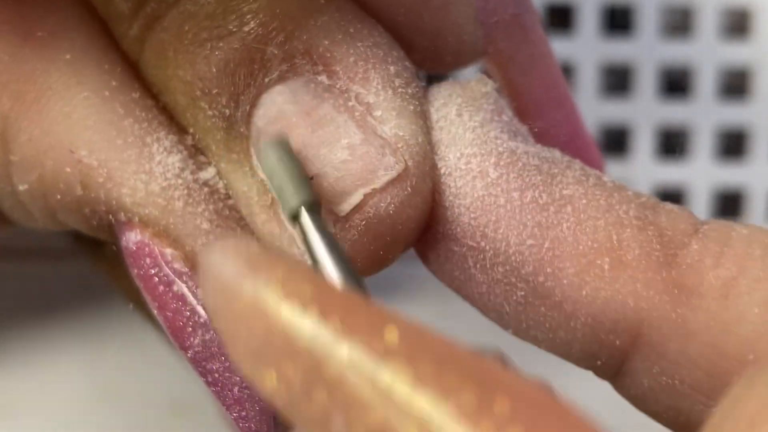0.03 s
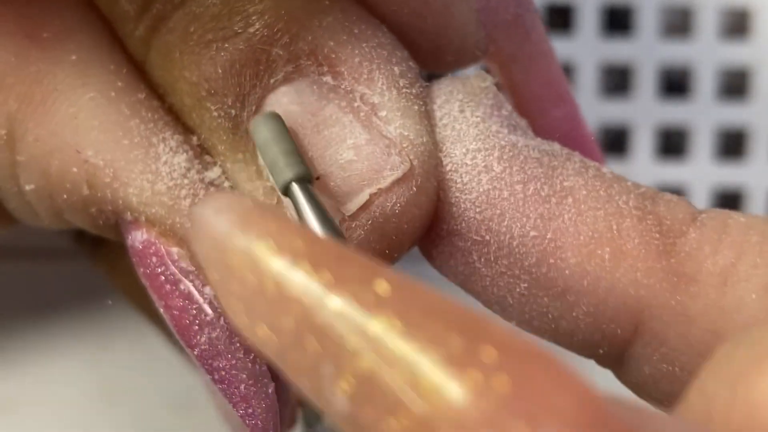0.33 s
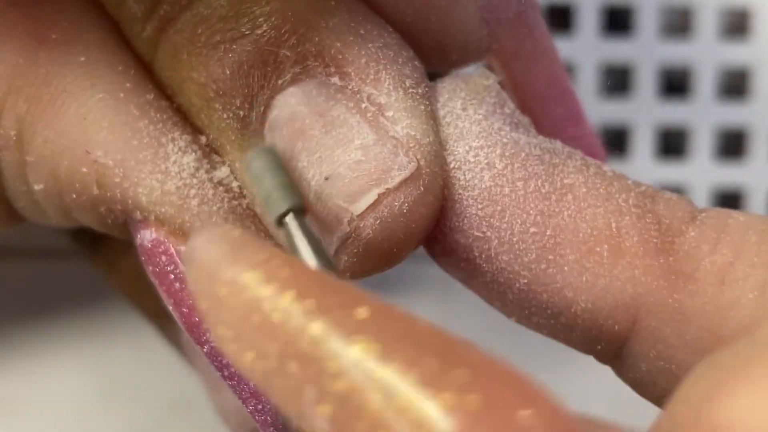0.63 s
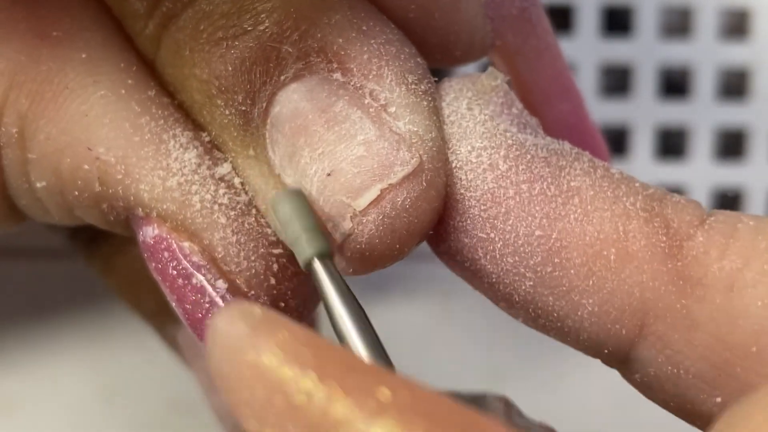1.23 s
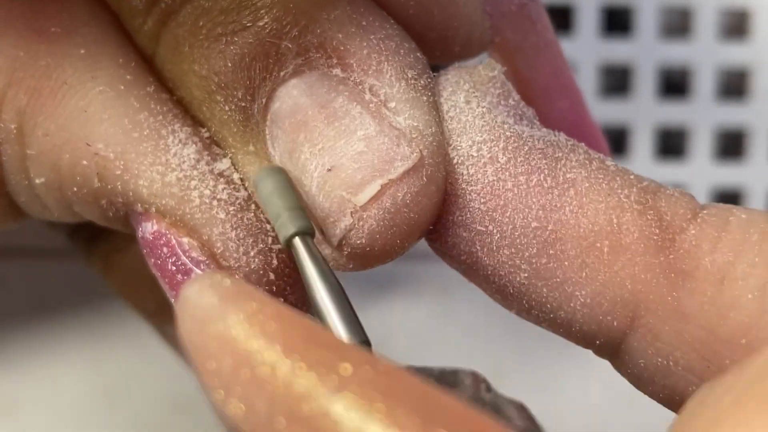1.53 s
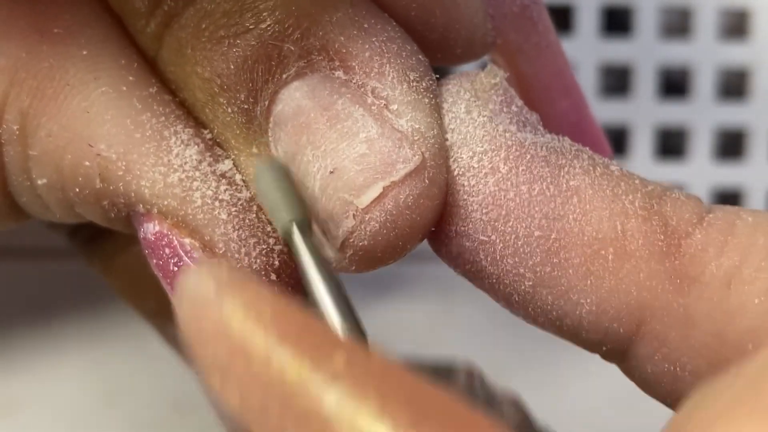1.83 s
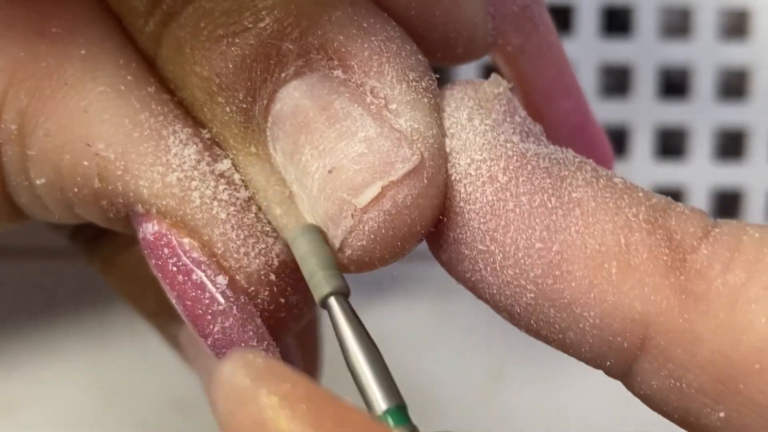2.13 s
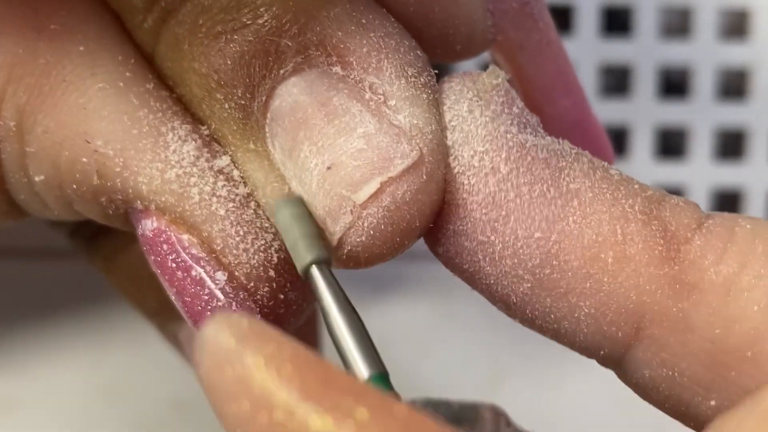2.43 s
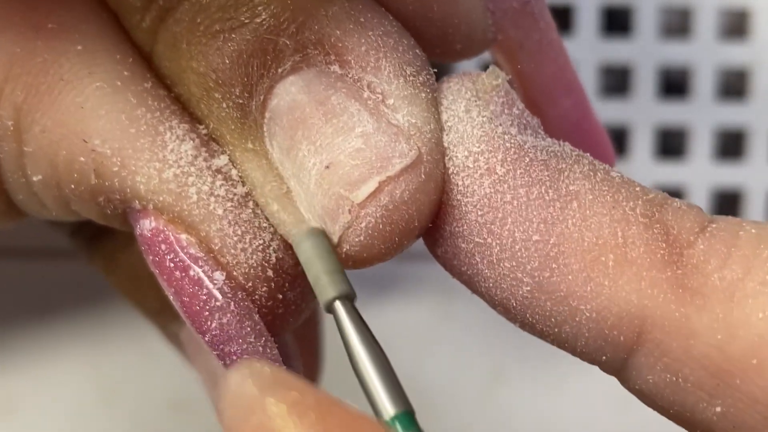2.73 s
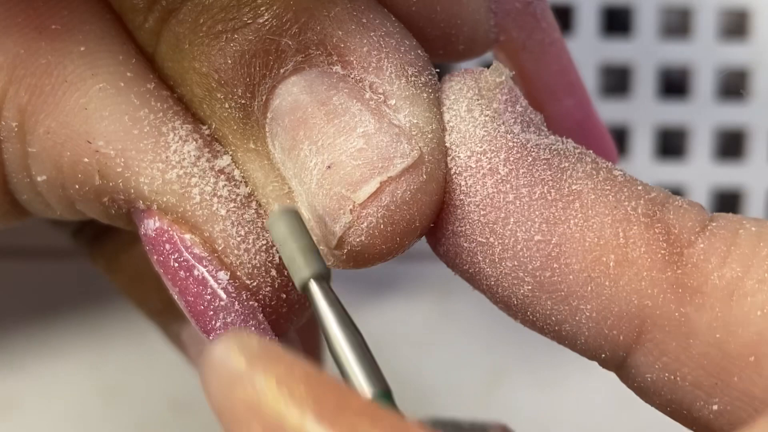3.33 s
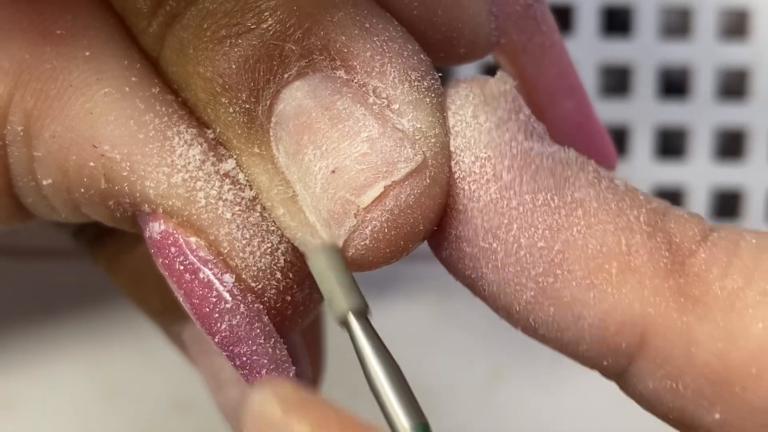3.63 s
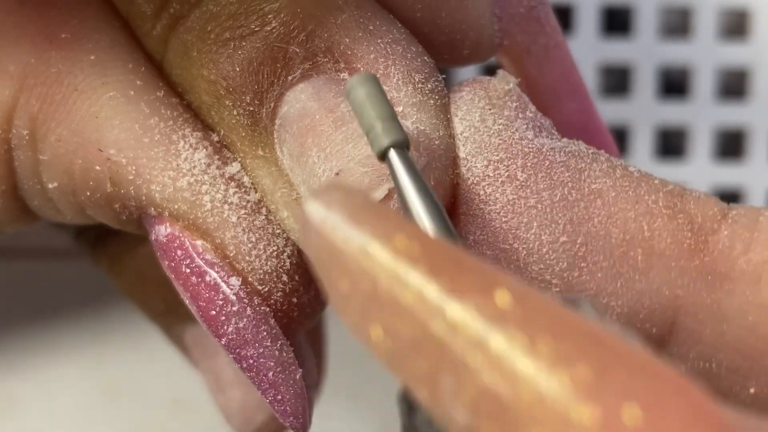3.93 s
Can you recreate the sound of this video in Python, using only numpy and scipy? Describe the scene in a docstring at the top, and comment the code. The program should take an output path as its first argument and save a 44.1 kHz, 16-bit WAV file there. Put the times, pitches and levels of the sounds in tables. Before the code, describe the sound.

An electric nail drill whines and grinds against a fingernail over a faint fan hum.

```python
"""Electric nail drill on a fingernail

A nail drill spins close by, its bearings whining, while its rough bit is stroked along a nail.
The same grit passes the nail on every turn, so the grinding buzzes at the speed of the shaft,
which sags under load. A dust-collector fan hums underneath. There is no room echo."""
import sys
import numpy as np
from scipy import signal
from scipy.fft import rfft, irfft, next_fast_len
from scipy.io import wavfile
from scipy.ndimage import uniform_filter1d, map_coordinates

SR = 44100
rng = np.random.default_rng(int(sys.argv[2]) if len(sys.argv) > 2 else 0)


def generate_wav(signal):
    """Clip the signal to [-1, 1] and save it as 16-bit WAV at the path in sys.argv[1]."""
    frames = np.transpose(np.atleast_2d(signal))
    scaled = np.clip(frames, -1, 1) * 32767
    pcm = np.round(scaled).astype(np.int16)
    wavfile.write(sys.argv[1], SR, pcm)


N = 176400  # 4 seconds

# How fast the shaft spins: time_s, turns_per_s
SHAFT_SPEED = [(0.0, 185.4), (0.21, 190.0), (0.27, 187.1), (0.39, 191.9), (0.54, 189.3), (0.6, 193.7),
               (0.65, 191.0), (0.78, 192.8), (0.8, 189.4), (0.91, 191.5), (1.06, 190.1), (1.13, 191.1),
               (1.27, 193.0), (1.4, 190.9), (1.51, 194.8), (1.59, 193.4), (1.61, 190.1), (1.82, 194.9),
               (1.91, 188.7), (2.05, 192.9), (2.17, 188.7), (2.23, 188.7), (2.4, 193.1), (2.51, 191.0),
               (2.64, 193.3), (2.73, 189.8), (2.98, 191.9), (3.05, 190.9), (3.11, 194.3), (3.21, 196.3),
               (3.34, 196.7), (3.39, 199.5), (3.56, 196.6), (3.77, 200.6), (3.86, 199.8), (3.99, 203.3)]


def grinding(turns):
    """The bit buzzes, rasps and hisses while it touches the nail; turns counts the shaft's turns."""
    # One list per stroke, from touch to lift: time_s, buzz_gain_db, rasp_gain_db, hiss_gain_db
    strokes = [
        [(0.0, -38.5, -48.5, -47), (0.03, -59, -60, -50)],
        [(0.135, -47, -54.5, -48.5), (0.217, -40.5, -56, -40), (0.25, -46, -55.5, -41.5),
         (0.295, -42.5, -51.5, -40.5)],
        [(0.36, -43, -51.5, -49), (0.47, -39.5, -53, -41), (0.52, -43, -50.5, -46), (0.65, -41, -50, -39.5),
         (0.682, -46, -54, -42), (0.844, -42, -50, -39.5), (0.87, -43.5, -53, -44), (0.95, -41.5, -46.5, -41),
         (0.99, -37, -53.5, -39), (1.086, -47, -53.5, -44), (1.148, -38.5, -46, -42.5), (1.166, -37, -59, -40),
         (1.23, -43.5, -56.5, -45.5), (1.32, -41.5, -54.5, -42.5), (1.406, -46.5, -55, -41),
         (1.435, -39.5, -58, -46)],
        [(1.525, -53, -49, -36.5), (1.55, -45.5, -47, -39), (1.62, -43, -57.5, -43), (1.66, -55, -61, -44),
         (1.715, -43, -62, -50)],
        [(1.78, -44.5, -46.5, -41.5), (1.848, -40.5, -44.5, -37.5), (1.878, -41.5, -54.5, -42),
         (2.014, -47, -63, -49), (2.042, -40.5, -54.5, -44.5), (2.248, -49.5, -58, -44.5),
         (2.29, -46, -63, -52)],
        [(2.432, -44.5, -54.5, -42.5), (2.552, -46, -62.5, -46.5), (2.63, -43, -54.5, -43.5),
         (2.8, -50.5, -59, -44.5), (2.922, -47.5, -62, -47.5), (2.996, -44.5, -56, -42.5),
         (3.03, -45, -60, -50)],
        [(3.425, -40, -59, -46.5), (3.443, -44.5, -49.5, -41.5), (3.51, -52.5, -57, -48.5),
         (3.62, -46.5, -56, -47), (3.66, -50, -59, -49)],
    ]
    touch_s, lift_s = 0.0012, 0.0046
    t, gains = clock(), np.zeros((3, N))
    for stroke in strokes:
        fade_in = np.clip((t - stroke[0][0]) / touch_s + .5, 0, 1)
        fade_out = np.clip((stroke[-1][0] - t) / lift_s + .5, 0, 1)
        gains += fade_in * fade_out * amp(curves(stroke))
    buzz_gain, rasp_gain, hiss_gain = gains
    return rasp_gain * rasp(turns) + buzz_gain * buzz(turns) + hiss_gain * hiss(turns)


def buzz(turns):
    """Repeating grit buzzes, and the bit rings at a pitch that moves with the point of contact."""
    # Centre of the ringing: time_s, pitch_hz
    ring_pitch = [(.14, 3100), (.2, 3520), (.29, 2950), (.45, 3480), (.53, 2950), (.62, 3450), (.72, 3000),
                  (.8, 3600), (.88, 3250), (.96, 3450), (1.0, 3150), (1.15, 3300), (1.29, 2950),
                  (1.38, 3400), (1.55, 3450), (1.62, 2900), (1.83, 3550), (1.92, 2950), (2.2, 3300),
                  (2.26, 2900), (2.5, 3000), (2.78, 2800), (2.87, 3250), (3.0, 2900), (3.44, 3400),
                  (3.62, 3000)]
    # Tone colour of the scraping: pitch_hz, gain_db
    scrape_colour = [(900, -40), (1900, -17), (2300, -4), (2850, 3), (3400, 1), (3700, -5), (3950, -17),
                     (4400, -15), (4600, 0), (4900, -14), (9000, -42)]
    ring = resonance(turns, curves(ring_pitch)[0], half_width_hz=250)
    scrape = colour(grit(turns, memory=.8, lopsided=.45), scrape_colour)
    return hold_level(scrape + amp(1.5) * ring) * amp(.5 + 2.1 * wobble(34))


def hiss(turns):
    """The bright, flickering part of the scraping, from grit that changes faster between turns."""
    # Tone colour of the hiss: pitch_hz, gain_db
    hiss_colour = [(1000, -30), (3000, -4), (3600, -5), (4000, -12), (4600, -4), (4950, -5), (5400, 0),
                   (5700, 1.5), (6350, 7), (6900, -2.5), (7800, -4), (9000, -15), (10500, -21.5),
                   (13000, -26), (15500, -29)]
    scrape = grit(turns, memory=.62, lopsided=.029) * amp(1.8 * wobble(550))
    return hold_level(colour(scrape, hiss_colour)) * amp(5 + 1.12 * wobble(80))


def rasp(turns):
    """The low part of the grinding: tones that repeat with each turn, plus noise."""
    # Pitches of the tones: cycles_per_turn
    multiples = [4, 5, 6, 7, 8, 9, 12]
    # Strength of each: gain_db
    gains = [-21.5, -18.5, -17, -6.5, -10, -18, -13]
    # Tone colour of the noise: pitch_hz, gain_db
    rasp_colour = [(300, -28), (600, -7), (1100, -5), (1370, 9), (1560, 6), (1800, -12), (3000, -21)]
    tones = shaft_tones(turns, multiples, gains, waver_db=1.6, drift=.4, rate=45)
    return amp(6.5) * tones + amp(-4.5) * noise(rasp_colour)


def grit(turns, memory, lopsided):
    """The bit's surface passing the nail: memory is the share kept each turn; one side bites harder."""
    max_turns, spots_per_turn = 900, 200
    fresh = rng.standard_normal((max_turns, spots_per_turn))
    renewal = np.sqrt(1 - memory ** 2)
    surface, _ = signal.lfilter([renewal], [1, -memory], fresh[1:], axis=0, zi=memory * fresh[:1])
    bite = np.exp(lopsided * np.cos(2 * np.pi * turns))
    return bite * map_coordinates(surface.ravel(), [turns * spots_per_turn], mode="wrap")


def resonance(turns, centre_hz, half_width_hz):
    """Multiples of the shaft speed, each louder the nearer it is to a pitch the bit rings at."""
    speed = curves(SHAFT_SPEED)[0]
    first = round((np.min(centre_hz) - 2 * half_width_hz) / speed.max())
    last = round((np.max(centre_hz) + 2 * half_width_hz) / speed.min())
    ring = np.zeros(N)
    for k in range(first, last + 1):
        distance = (k * speed - centre_hz) / half_width_hz
        ring += tone(k * turns, waver_db=2.4, drift=.65, rate=70) / (1 + distance ** 2)
    return unit(ring)


def squeals(turns):
    """Short swells in which the bit sings out at one of its ringing pitches."""
    # One row per squeal: peak_s, half_width_s, pitch_hz, level_db
    events = [(.2, .022, 3600, -43), (.22, .035, 4620, -46), (.46, .025, 4680, -46), (.63, .03, 4650, -50),
              (.83, .035, 4620, -47), (2.13, .025, 4680, -47), (2.25, .025, 4550, -53),
              (2.86, .08, 4580, -54), (.22, .07, 7200, -46), (.85, .05, 7270, -42.5),
              (1.06, .05, 7270, -48)]
    return sum(amp(db) * swell(s, width) * hold_level(resonance(turns, hz, half_width_hz=70))
               for s, width, hz, db in events)


def catches():
    """Brief, bright jolts as the bit catches on the nail."""
    # One row per jolt: start_s, level_db
    jolts = [(.803, -31), (.829, -32), (.977, -29), (1.144, -25), (1.529, -27), (1.546, -22), (1.784, -30),
             (1.822, -30)]
    # Tone colour of a jolt: pitch_hz, gain_db
    jolt_colour = [(700, -28), (1400, -4), (3200, -6), (4100, -14), (6400, 6), (9000, -17), (15000, -32)]
    return noise(jolt_colour) * sum(amp(db) * die_away(s, fade_s=.011) for s, db in jolts)


def tap():
    """One light tap of the tool: a very short ring and a little contact noise."""
    # Tone colour of the contact noise: pitch_hz, gain_db
    click_colour = [(400, -7), (3500, 3), (6000, -9), (12000, -35)]
    start_s, pitch_hz = 3.218, 1350
    ring = np.sin(2 * np.pi * pitch_hz * (clock() - start_s))
    click = amp(-9) * noise(click_colour)
    return amp(-32) * die_away(start_s, fade_s=.009) * (ring + click)


def motor(turns):
    """The shaft and bearings whine in five groups of tones, over the noise of the rolling balls."""
    # How four of the groups rise and fall: time_s, main_db, treble_db, low_db, top_db
    whine_gains = [(0, -50.5, -51.5, -73, -68), (.28, -41, -52, -66, -79), (.55, -56, -58, -68, -90),
                   (.9, -47, -52, -68, -79), (1.3, -46, -51, -73, -73), (1.75, -39.5, -50.5, -69, -72),
                   (2.05, -56, -57, -58, -72), (2.7, -59, -53.5, -75, -72), (3.3, -49, -59, -62.5, -64),
                   (3.45, -43, -56, -57, -60), (3.72, -43, -59, -60, -60.5), (4, -46.5, -61, -50.5, -68)]
    # Each group has a list of pitches (cycles_per_turn) and a list of strengths (gain_db).
    main_multiples = [27.9, 32.6, 33.4, 33.8]
    main_gains = [-14, -5, -1, -12]
    low_multiples = [21.6, 22.4]
    low_gains = [-5, 0]
    treble_multiples = [34.65, 38.1, 38.9, 43.6, 44.4, 55.4, 66.9]
    treble_gains = [-3, -2, -2, -10, -15, -16, -15]
    top_multiples = [49.1, 49.9]
    top_gains = [-1, -3]
    steady_multiples = [1, 3, 5.5, 7, 10, 27.1, 28.4, 43.6]
    steady_gains = [-64, -72.5, -70, -63, -55.5, -67, -66, -68]
    main_db, treble_db, low_db, top_db = curves(whine_gains)
    whine = amp(main_db) * shaft_tones(turns, main_multiples, main_gains, drift=.3, rate=30)
    whine += amp(low_db) * shaft_tones(turns, low_multiples, low_gains, drift=.3, rate=36)
    whine += amp(treble_db) * shaft_tones(turns, treble_multiples, treble_gains, drift=.45, rate=31)
    whine += amp(top_db) * shaft_tones(turns, top_multiples, top_gains, drift=.45, rate=31)
    steady = sum(amp(db) * tone(k * turns, waver_db=.7, drift=.014 * k, rate=16)
                 for k, db in zip(steady_multiples, steady_gains))
    return whine + steady + rolling(turns, treble_db)


def rolling(turns, treble_db):
    """Bearing noise that pulses as the balls pass and gently follows the level of the treble whine."""
    # Tone colour of the rolling: pitch_hz, gain_db
    roll_colour = [(800, -24.5), (1300, -20.5), (1700, -12.5), (2400, -5.5), (3300, -11.5), (4000, -15),
                   (4400, -7.5), (4900, -13.5), (5400, -3.5), (6000, -11), (6450, 4), (6900, -0.5),
                   (7500, -6.5), (8300, -15), (10000, -18.5), (12500, -21), (15500, -23)]
    passes_per_turn = 5.5
    pulses = np.exp(.5 * np.cos(2 * np.pi * passes_per_turn * turns)) * amp(1.5 * wobble(250))
    level_db = -45 + .23 * (treble_db - treble_db.mean())
    return amp(level_db) * colour(pulses * rng.standard_normal(N), roll_colour)


def whistle():
    """Faint, very high tones from the electronics."""
    # One row per tone: pitch_hz, level_db
    tones = [(15558, -72), (15682, -67)]
    return sum(amp(db) * tone(hz * clock(), waver_db=1, drift=.4, rate=6.5) for hz, db in tones)


def fan():
    """The dust collector hums, its air rushes and swells, and its draught brushes the microphone."""
    # Tones of the hum: pitch_hz, level_db
    hum_tones = [(60, -52.5), (120, -73.5), (194, -71.5)]
    # Swells in the rush of air: peak_s, half_width_s, pitch_hz, level_db
    air_swells = [(1.605, 0.073, 320, -61), (3.02, 0.22, 500, -61), (3.77, 0.18, 296, -57),
                  (3.69, 0.85, 1200, -59)]
    # Tone colour of the steady rush: pitch_hz, gain_db
    rush_colour = [(12, -14), (32, 7), (48, -5.5), (60, 4), (72, -13), (113, -13), (192, -17.5), (230, -20),
                   (400, -24.5), (800, -26), (1320, -23.5), (1600, -46), (3000, -83)]
    # Puffs of draught: peak_s, half_width_s, level_db
    puffs = [(1.77, 0.077, -44), (3.27, 0.048, -36.5), (3.49, 0.081, -38.5)]
    # Tone colour of a puff: pitch_hz, gain_db
    puff_colour = [(12, -10.5), (28, -18), (37, -17), (55, -30), (120, -39.5), (400, -72)]
    hum = sum(amp(db) * tone(hz * clock(), waver_db=1.5, drift=.99, rate=16) for hz, db in hum_tones)
    edge = 2 ** .85  # 0.85 octaves either side of a swell's pitch
    air = np.zeros(N)
    for s, width, hz, db in air_swells:
        band = [(20, -60), (hz / edge, -13), (hz, 0), (hz * edge, -13), (8000, -70)]
        air += amp(db) * swell(s, width) * noise(band)
    rush = amp(-48.5) * noise(rush_colour)
    draught = noise(puff_colour) * sum(amp(db) * swell(s, width) for s, width, db in puffs)
    return hum + air + rush + draught


def shaft_tones(turns, multiples, gains_db, drift, rate, waver_db=2.2):
    """Wavering tones whose pitches are multiples of the shaft speed."""
    return sum(amp(db) * tone(k * turns, waver_db, drift, rate) for k, db in zip(multiples, gains_db))


def tone(cycles, waver_db, drift, rate):
    """A sine wave whose level and phase (drift, in radians) wander about rate times a second."""
    level = amp(waver_db * wobble(rate))
    phase = 2 * np.pi * (cycles + rng.random()) + drift * wobble(rate)
    return unit(level * np.sin(phase))


def noise(points):
    """Noise with the tone colour given by (pitch_hz, gain_db) points."""
    return colour(rng.standard_normal(N), points)


def colour(x, points):
    """Filter x through (pitch_hz, gain_db) points, then scale it to an average level of 1."""
    size = next_fast_len(N + 8192)
    hz, db = np.transpose(points)
    bin_hz = np.fft.rfftfreq(size, 1 / SR)
    gain = amp(np.interp(np.log(bin_hz + 1), np.log(hz + 1), db, right=-90))
    return unit(irfft(rfft(x, size) * gain, size)[:N])


def wobble(rate):
    """A smooth curve through rate random values a second."""
    steps = np.arange(0, N / SR * rate + 1, 1 / 8)
    smooth = map_coordinates(rng.standard_normal(4096), [steps], mode="wrap")
    return np.interp(clock() * rate, steps, smooth)


def swell(peak_s, half_width_s):
    """A smooth rise and fall."""
    return np.exp(-.5 * ((clock() - peak_s) / half_width_s) ** 2)


def die_away(start_s, fade_s):
    """A sudden start, then a fall of 60 dB every fade_s."""
    age = clock() - start_s
    return (age > 0) * amp(-60 * np.abs(age) / fade_s)


def hold_level(x, window_s=.03):
    """Keep the level of x near 1: the bit bites steadily while its grit wears and shifts."""
    power = np.abs(uniform_filter1d(x ** 2, round(window_s * SR)))
    return x / np.sqrt(power + 1e-9)


def curves(rows):
    """Join rows of (time_s, values...) with straight lines: one curve per value column."""
    times, *columns = np.transpose(rows)
    return [np.interp(clock(), times, column) for column in columns]


def clock():
    """The time of every sample, in seconds."""
    return np.arange(N) / SR


def unit(x):
    """Scale x to an average (rms) level of 1."""
    return x / np.sqrt(np.mean(x ** 2) + 1e-20)


def amp(db):
    """Turn decibels into a gain."""
    return 10 ** (np.asarray(db) / 20)


def scene():
    """The drill and the fan, the same in both channels."""
    turns = np.cumsum(curves(SHAFT_SPEED)[0]) / SR
    nail_work = grinding(turns) + squeals(turns) + catches() + tap()
    mono = nail_work + motor(turns) + whistle() + fan()
    return np.array([mono, mono])


def record(dry):
    """Cut off the very highest treble."""
    top_hz = 15760
    size = next_fast_len(N + 8192)
    passes = np.fft.rfftfreq(size, 1 / SR) < top_hz
    return irfft(rfft(dry, size) * passes, size)[:, :N]


dry = scene()
out = record(dry)
generate_wav(out)
```